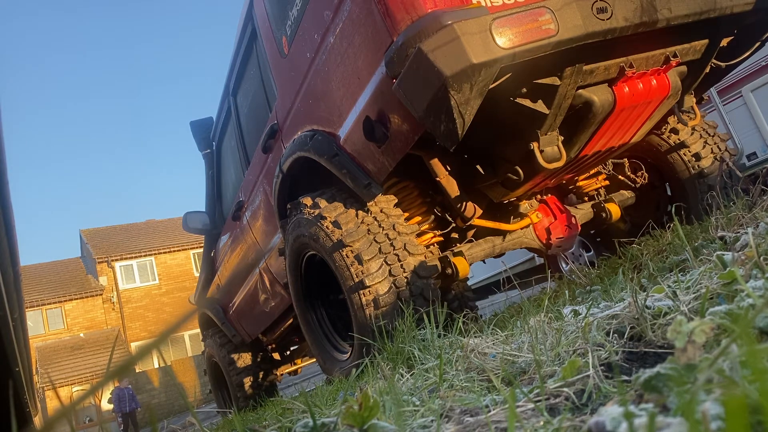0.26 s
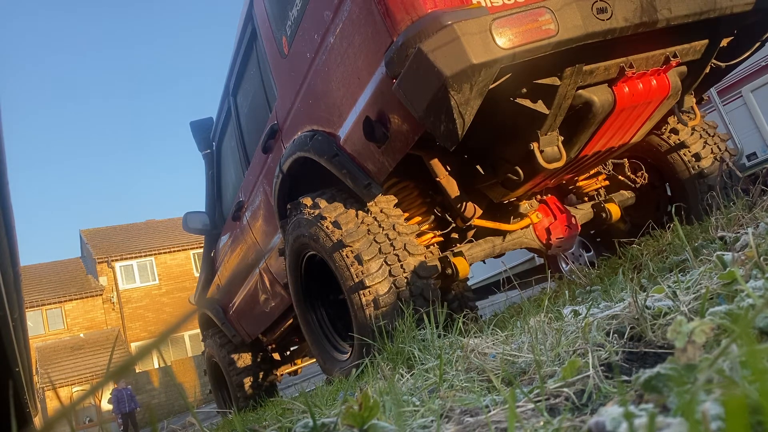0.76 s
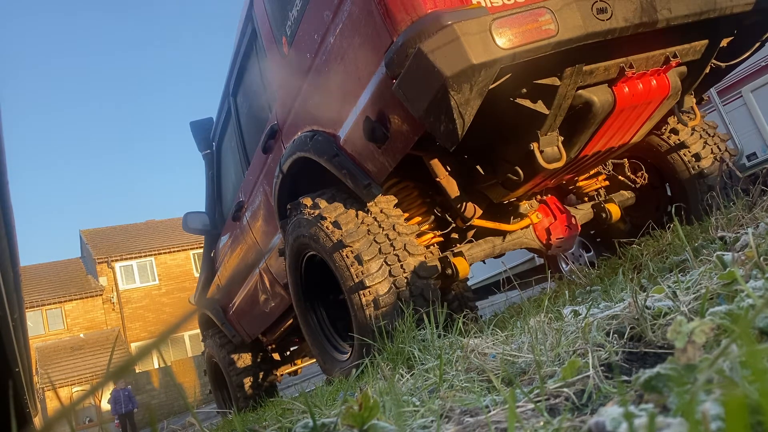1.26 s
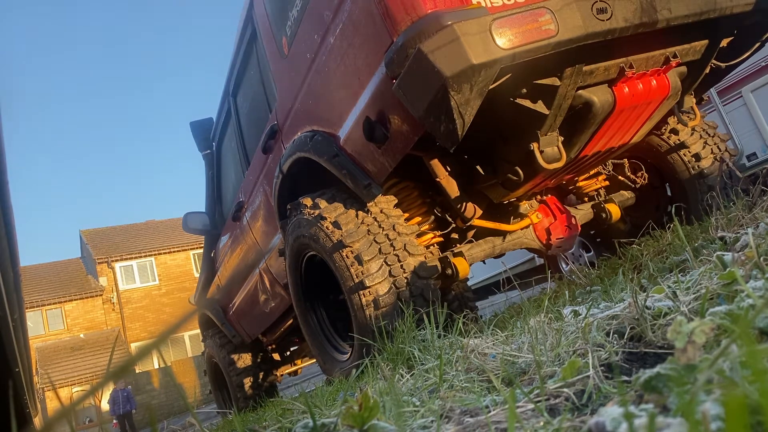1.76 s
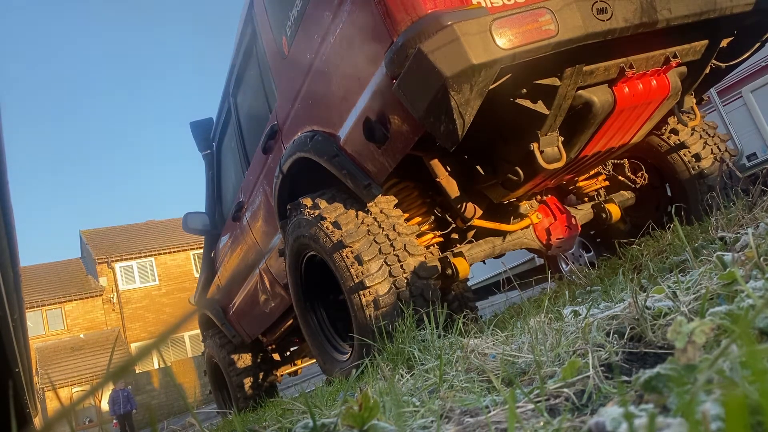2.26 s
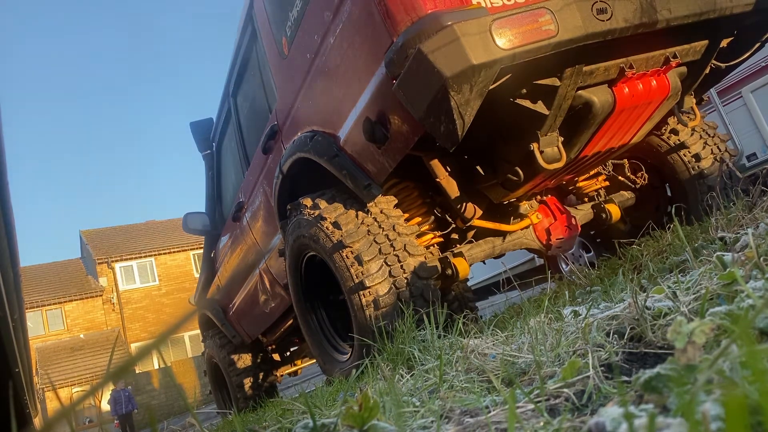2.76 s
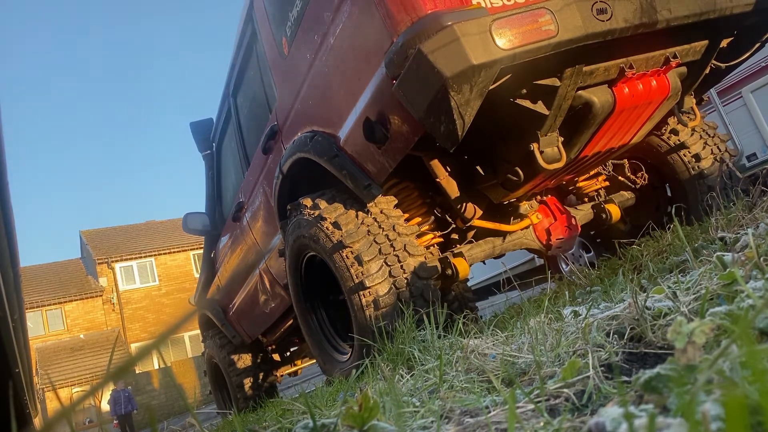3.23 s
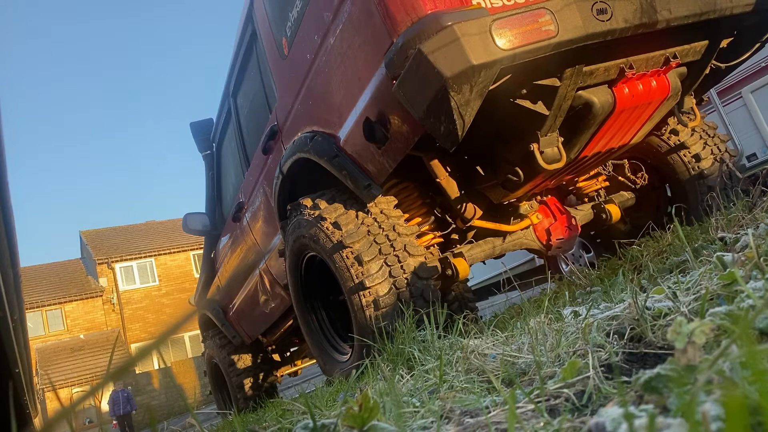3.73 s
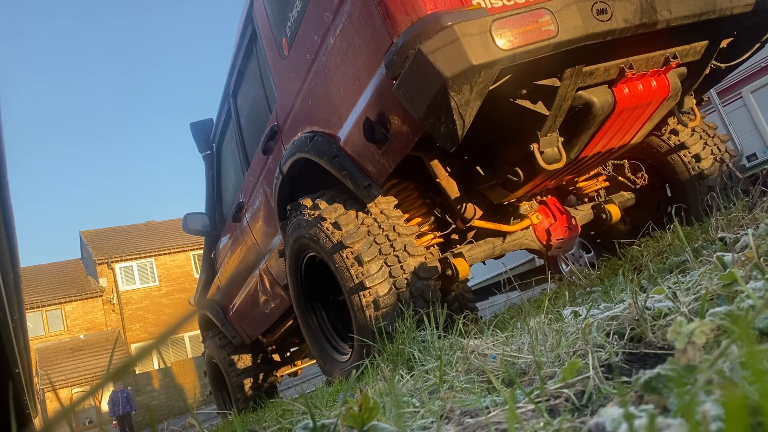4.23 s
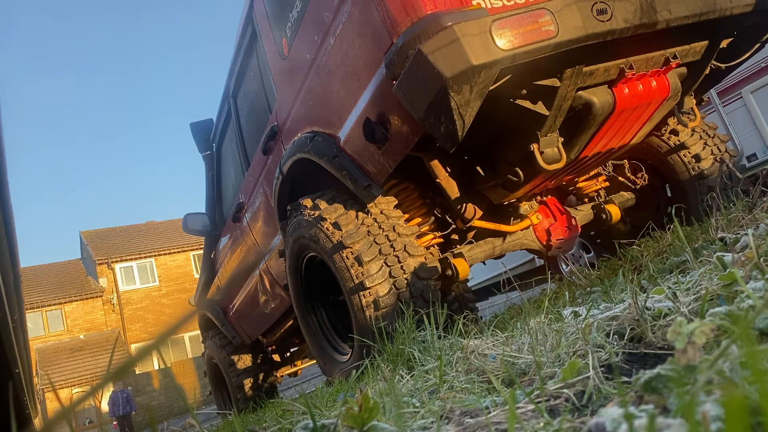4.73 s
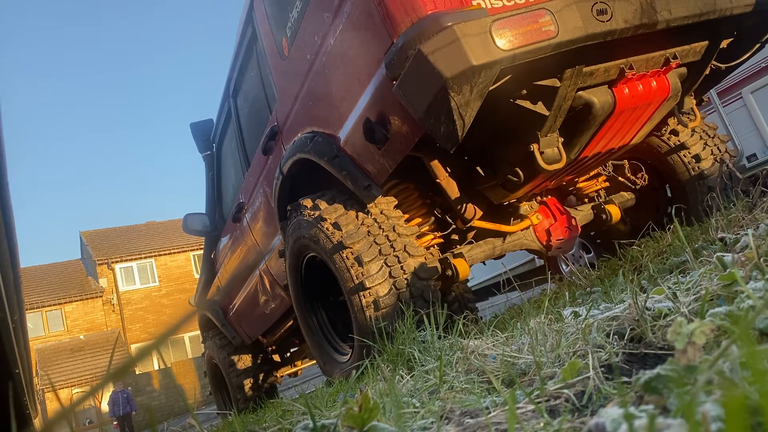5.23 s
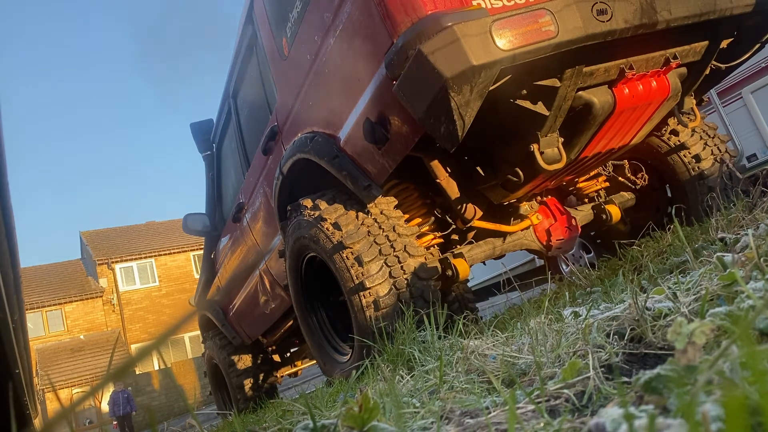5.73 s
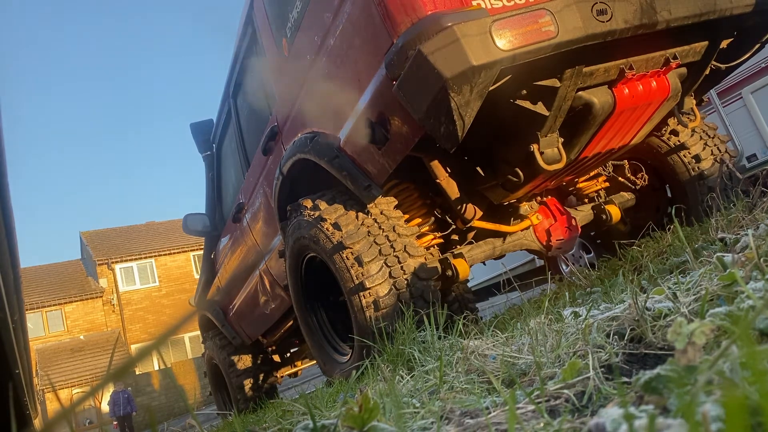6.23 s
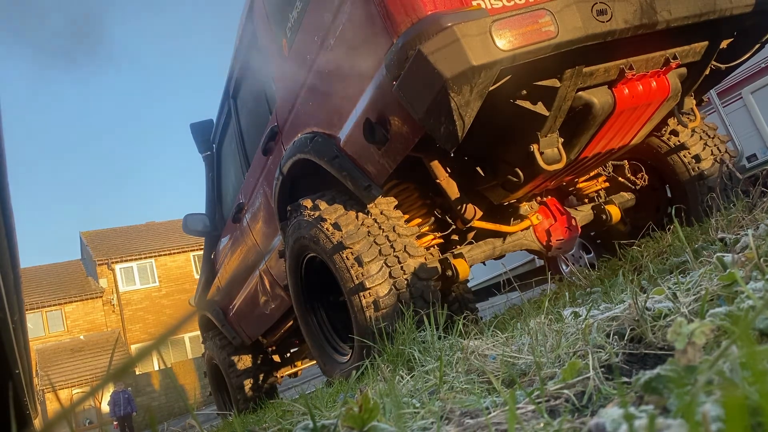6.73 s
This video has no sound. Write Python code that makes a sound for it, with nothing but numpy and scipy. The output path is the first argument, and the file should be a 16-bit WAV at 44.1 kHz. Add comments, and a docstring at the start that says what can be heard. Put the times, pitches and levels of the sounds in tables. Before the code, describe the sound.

A five-cylinder diesel hunts at idle, heard in close stereo near the exhaust outlet. It starts with a steady clattering chug, then lurches: quick loud barks with rattling knock and airy hiss, each dropping abruptly to soft, slower puffs and a fluttering whistle. A calmer stretch comes midway, then surging resumes, with the strongest bark near the end before it settles. Open air, almost no echo.

```python
"""A cold five-cylinder turbodiesel hunts at idle, heard outdoors close to its tail pipe.
Fuel comes in bursts: the engine speeds up and barks, then coasts almost silently while the whistle sinks.
Each firing sends filtered impulses down the pipe, noise bursts through block resonances and a spit of gas.
The turbo is a pair of randomly shaken tones; two close microphone ports hear it all unequally."""
import sys
import numpy as np
from scipy import signal
from scipy.fft import rfft, irfft, next_fast_len
from scipy.io import wavfile
from scipy.ndimage import uniform_filter1d, map_coordinates

SR = 44100
rng = np.random.default_rng(int(sys.argv[2]) if len(sys.argv) > 2 else 0)


def dump_mix(stems):
    """Bounce the given channels to the path in sys.argv[1] as a 16-bit WAV at rate SR."""
    frames = np.atleast_2d(stems).T  # one column per channel
    limited = np.clip(frames, -1, 1)  # hard clip at full scale
    pcm = np.round(limited * 32767).astype(np.int16)
    wavfile.write(sys.argv[1], SR, pcm)


def volts(x):
    """Linear amplitude factor 10**(x/20) for a level x in dB, scalar or array-like."""
    e = np.asarray(x, float) / 20
    return 10 ** e


N = 307818

# The governor's dose. Each row: time in seconds, share of full fuel.
FUEL_DOSE = [(0, 0.31), (0.574, 0.319), (0.621, 0.621), (0.664, 0.781), (0.723, 0.768), (0.792, 0.076),
             (0.968, 0.054), (1.021, 0.261), (1.054, 0.572), (1.242, 0.165), (1.308, 0.726), (1.413, 0.879),
             (1.431, 0.936), (1.484, 0.371), (1.525, 0.108), (1.706, 0.07), (1.782, 0.542), (1.993, 0.261),
             (2.092, 0.437), (2.198, 0.951), (2.294, 0.665), (2.32, 0.147), (2.519, 0.066), (2.586, 0.232),
             (2.622, 0.702), (2.703, 0.311), (3.002, 0.332), (3.327, 0.339), (3.349, 0.646), (3.5, 0.127),
             (3.613, 0.527), (3.672, 0.811), (3.774, 0.136), (3.92, 0.038), (3.922, 0.945), (4.049, 0.0),
             (4.156, 0.288), (4.318, 0.424), (4.397, 0.844), (4.5, 0.082), (4.622, 0.077), (4.623, 0.622),
             (4.775, 0.126), (4.876, 0.812), (4.952, 0.124), (5.025, 0.064), (5.078, 0.22), (5.135, 0.921),
             (5.208, 0.887), (5.287, 0.132), (5.327, 0.072), (5.432, 0.112), (5.64, 0.74), (5.698, 0.861),
             (5.858, 0.972), (5.885, 0.289), (6.033, 0.134), (6.198, 0.041), (6.272, 0.647), (6.425, 0.252),
             (6.647, 0.351), (6.98, 0.343)]
# Unequal manifold runs, in firing order. Each row: thump delay in ms at full spread,
# relative thump in dB, relative knock in dB.
CYLINDER_RUNS = [(-0.39, 0.5, -2), (1.27, -1, -3.5), (-2.38, -1, -2.5), (0.46, 1, -2.5), (-1.57, 1.7, -3)]
# Lowest modes of the exhaust pipe. Each row: frequency in Hz, width in Hz, relative level in dB.
PIPE_MODES = [(54.6, 26, -0.5), (137, 36, 1.5)]
# Block and underbody struck by a firing. Each row: frequency in Hz, width in Hz, relative level in dB.
BLOCK_MODES = [(223, 59, -0.5), (317, 72, 6.5), (510, 462, 0.5), (758, 98.4, 6), (901, 63, 1),
               (1172, 171, 1.5), (1369, 150, 0.1), (1667, 104, -4.5), (1809, 70, -6.5), (2548, 18, -14),
               (3220, 130, -11.5), (5510, 215, -11.5)]
# Spectrum of one firing's thump. Each row: frequency in Hz, relative level in dB.
THUMP_SPECTRUM = [(80, -58), (120, -8), (150, 2.5), (190, 0.7), (235, 1.5), (262, -10.5), (320, -4),
                  (450, -30.5), (800, -77)]
# Turbulence inside the pipe. Each row: frequency in Hz, relative level in dB.
DRONE_SPECTRUM = [(30, -36), (50, -2.5), (120, -2), (230, 0.7), (300, -12), (750, -17), (1400, -26.5),
                  (2100, -38), (3300, -36), (6000, -47), (10000, -66), (15800, -98)]
# Gas at the pipe mouth. Each row: frequency in Hz, relative level in dB.
HISS_SPECTRUM = [(1500, -66), (2600, 0.5), (3300, -1), (4500, -2), (5500, -5), (6300, -1), (8000, -9),
                 (9700, -6.5), (10800, -19), (13000, -11), (14500, -78), (15800, -54)]
# The pipe mouth favours some whistle pitches. Each row: frequency in Hz, gain in dB.
OUTLET_GAIN = [(2520, -0.5), (2720, -12), (2950, -2), (3070, -1.5), (3250, 6.5), (3380, 5.5), (3550, 1),
               (3800, 0.5), (4200, -1), (5100, -4)]
# Lead of the first port over the second. Each row: frequency in Hz, phase in radians.
PORT_LEAD = [(0, 0), (1980, -0.1), (2330, 2.5), (2840, -4.7), (3100, -5.1), (5250, -4.5), (6460, -5.2),
             (7410, -1.7), (10200, -6.0), (11600, -6.4), (12500, -9.2), (14400, -9.5), (15000, -12.6),
             (16600, -12.5)]
# Gain of the first port over the second. Each row: frequency in Hz, gain in dB.
PORT_TILT = [(60, -1.0), (110, -1.5), (200, -1.5), (380, -1.5), (700, -2.0), (1290, -3.0), (2380, 1.0),
             (4400, 2.5), (8120, 2.0), (15000, 0.0)]
# Likeness of the ports before lead and tilt. Each row: frequency in Hz, correlation for equal sources.
PORT_LIKENESS = [(100, .999), (600, .99), (1500, .96), (2500, .91), (5000, .82), (14000, .84)]
# How a layer follows the engine, before its own offset. Each row: level in dB at a dose sum of 1,
# dB per tenfold dose, dose left without fuel (sign ignored), lag in seconds (negative: none),
# dB per tenfold speed, dB per tenfold boost.
THUMP_FOLLOW = (-6.5, 22, 0.0662, -0.03, 0.5, -7)
BOOM_FOLLOW = (-11.8, 15.5, .03, .006, -12, 4)
KNOCK_FOLLOW = (-12.5, 26, 0, 0.0051, 5.5, -14)
HISS_FOLLOW = (-29, 25.5, -0.01, -0.01, 3.5, -10.5)
WHISTLE_FOLLOW = (-28.5, 11.5, 0.2, -1.3, -11, -1.5)

FIRST_TURN = .17  # share of a firing interval already past at the start
# speed in firings/s: settled without fuel, added at full fuel; flywheel lag
COAST_RATE_HZ, FUEL_RATE_HZ, FLYWHEEL_S = 24.6154, 51.058, .2265
IDLE_RATE_HZ, IDLE_BOOST = 41.5, .2  # reference speed, share of full boost
BOOST_POWER, SPOOL_S = 1.438, .567
# turbine pitch: at the start without fuel, its climb, added at full boost
SPIN_HZ, WARM_HZ_PER_S, BOOST_HZ = 1010, 55.6, 7795
SURGE_HZ, SURGE_S = 330, .06  # quick extra pitch under full fuel, its lag
HEARD_EARLY_S = .0031  # a dose sounds this long before its push reaches the flywheel
RUSH_HZ, RUSH_PULL = 5000, .35  # pitch of rushing air, share of the way the whoosh is drawn to it
# gain control: memory, level left alone, share of a rise taken back
GAIN_LAG_S, GAIN_FROM_DB, GAIN_SHARE = 1, -13.5, 1
TOP_HZ = 15830


def along(points, hz):
    """(Hz, value) points interpolated on a log frequency axis."""
    f, v = np.transpose(points)
    return np.interp(np.log(hz + 1), np.log(f + 1), v)


def unit(x):
    """Scaled to rms 1."""
    return x / np.sqrt(np.mean(x ** 2) + 1e-20)


def filtered(x, response):
    """x times a complex response of frequency."""
    m = next_fast_len(N + SR // 2)
    return irfft(rfft(x, m) * response(np.fft.rfftfreq(m, 1 / SR)), m)[..., :N]


def coloured(spectrum, x):
    """x through a (Hz, dB) spectrum, zero phase."""
    return filtered(x, lambda hz: volts(along(spectrum, hz)))


def resonances(modes):
    """Causal response of second-order (Hz, width, dB) modes, alternating in sign."""
    def response(hz):
        total = 0
        for k, (centre, width, db) in enumerate(modes):
            damping = 1j * hz * width
            total = total + (-1) ** k * volts(db) * damping / (centre ** 2 - hz ** 2 + damping)
        return total
    return response


def noise():
    """Two unrelated white noises: the direct sound and what scatters off the underbody."""
    return rng.standard_normal((2, N))


def train(at, sizes):
    """Impulses of the given sizes."""
    return np.bincount(np.clip(at.astype(int), 0, N - 1), sizes, N)


def bursts(at, sizes, rise_s, fall_s):
    """Envelope that swells to a peak 3 ms ahead of each firing mark and dies away."""
    t = np.arange(-SR // 20, SR // 20 + 1) / SR
    shape = np.where(t < 0, np.exp(-(t / rise_s) ** 2), np.exp(-np.abs(t) / fall_s))
    peaks = at - .003 * SR
    return np.abs(signal.fftconvolve(train(peaks, sizes), shape, mode="same"))


def lagged(x, lag_s, start=None):
    """x followed with a first-order delay, as by an inertia."""
    keep = np.exp(-1 / (max(lag_s, 1 / SR) * SR))
    first = x[0] if start is None else start
    return signal.lfilter([1 - keep], [1, -keep], x, zi=[keep * first])[0]


def fuel(ahead_s=0):
    """Share of full fuel per sample, read ahead_s early."""
    return np.interp(np.arange(N) / SR + ahead_s, *np.transpose(FUEL_DOSE))


def speed():
    """Firings a second: the flywheel follows the fuel."""
    return lagged(COAST_RATE_HZ + FUEL_RATE_HZ * fuel(), FLYWHEEL_S)


def boost():
    """Share of full boost: exhaust energy spools the turbo up slowly."""
    return lagged(fuel() ** BOOST_POWER, SPOOL_S)


def turbine():
    """Whistle pitch in Hz: follows boost, surges under a full dose, climbs as the wheel warms."""
    warm_hz = lagged(SPIN_HZ + WARM_HZ_PER_S * np.arange(N) / SR, SPOOL_S)
    return warm_hz + BOOST_HZ * boost() + SURGE_HZ * lagged(fuel() ** 2, SURGE_S)


def load(law):
    """Level in dB of a layer, from fuel, speed and boost; more air changes the burn."""
    full_db, per_dose, rest, lag_s, per_speed, per_boost = law
    dose = lagged(fuel(HEARD_EARLY_S), lag_s) + abs(rest)
    burn_db = full_db + per_dose * np.log10(dose)
    speed_db = per_speed * np.log10(speed() / IDLE_RATE_HZ)
    return burn_db + speed_db + per_boost * np.log10(boost() / IDLE_BOOST)


def per_firing(at, law):
    """A load as gain, held from 11 ms after one firing to 11 ms after the next."""
    firing = np.searchsorted(at, np.arange(N) - .011 * SR)
    held_db = load(law)[at][np.clip(firing, 0, len(at) - 1)]
    return volts(uniform_filter1d(held_db, size=SR // 200))


def firings():
    """Sample index and cylinder row of every firing, from the integrated speed."""
    turns = FIRST_TURN + np.cumsum(speed()) / SR
    at = np.flatnonzero(np.diff(np.floor(turns)))
    return at, np.array(CYLINDER_RUNS)[np.arange(len(at)) % len(CYLINDER_RUNS)]


def exhaust(at, cylinder, jitter_ms, scatter_db, drone_ref_db):
    """Suction pulses leave the pipe .31 interval late, thump and boom; turbulent gas drones under them."""
    chance = rng.standard_normal((len(at), 2))
    arrival = at + .31 * np.gradient(at)
    thump_db = load(THUMP_FOLLOW)
    spread = np.clip(volts(-17 - thump_db[at]), .3, 1)  # a full dose evens out the cylinders
    delay_ms = spread * (cylinder[:, 0] + jitter_ms * chance[:, 0])
    sizes = -volts(cylinder[:, 1] + scatter_db * chance[:, 1])
    thump = unit(coloured(THUMP_SPECTRUM, train(arrival + delay_ms * SR / 1000, sizes)))

    def pipe(hz):
        lowpass = 1 / (1 + (hz / 150) ** 6)
        highpass = 1 / (1 + (33 / (hz + 1)) ** 8)
        return resonances(PIPE_MODES)(hz) * lowpass * highpass

    boom = unit(filtered(train(arrival, -np.ones(len(at))), pipe))
    drone_db = drone_ref_db + .46 * (thump_db + 23)  # turbulence varies less than the pulses
    drone = volts(drone_db) * unit(coloured(DRONE_SPECTRUM, noise()))
    direct = np.array([[1], [0]])
    return drone + direct * (volts(thump_db - 3.0) * thump + volts(load(BOOM_FOLLOW)) * boom)


def knock(at, cylinder, scatter_db, between_db, sharp_db):
    """Diesel knock: one sharp blow and a few rough milliseconds into the block, over a steadier rattle."""
    chance = rng.standard_normal((len(at), 2))
    sizes = volts(cylinder[:, 2] + scatter_db * chance[:, 0])
    envelope = unit(bursts(at, sizes, rise_s=.0054, fall_s=.0047)) + volts(between_db)
    rough = unit(noise() * volts(2.15 * rng.standard_normal(N)))
    blow_at = at + (.0004 * chance[:, 1] - .005) * SR
    sharp = volts(sharp_db) * unit(train(blow_at, sizes))

    def block(hz):
        highpass = (1j * hz / 140 / (1 + 1j * hz / 140)) ** 2
        return resonances(BLOCK_MODES)(hz) * highpass

    return per_firing(at, KNOCK_FOLLOW) * unit(filtered(envelope * rough + sharp, block))


def hiss(at, scatter_db, between_db):
    """Gas spits from the pipe mouth with each firing, over a steady flow."""
    sizes = volts(scatter_db * rng.standard_normal(len(at)))
    puff = unit(bursts(at, sizes, rise_s=.0039, fall_s=.0046)) + volts(between_db)
    grain = noise() * volts(2.3 * rng.standard_normal(N))
    spit = unit(coloured(HISS_SPECTRUM, puff * grain))
    steady = volts(-52.5) * unit(coloured(HISS_SPECTRUM, noise()))  # air is pumped even without fuel
    return volts(4.5) * per_firing(at, HISS_FOLLOW) * spit + steady


def gliding(width_hz, knot_s, above_hz=0):
    """A pair of tones above_hz over the turbine pitch, each shaken at random by width_hz."""
    knots = rng.standard_normal((2, int(N / SR / knot_s) + 4))
    places = [np.arange(N) / SR / knot_s]
    wander = np.array([map_coordinates(row, places) for row in knots])
    pitch_hz = turbine() + above_hz + width_hz * wander
    return np.sin(2 * np.pi * np.cumsum(pitch_hz, axis=1) / SR)


def whistle(at, whoosh_ref_db):
    """The turbine sings a tone that puffs chop into beads; hard gas flow turns it into a broad whoosh."""
    flow = np.minimum(uniform_filter1d(volts(load(HISS_FOLLOW) + 32.5), size=SR // 20), 1)
    throb = unit(bursts(at, volts(rng.standard_normal(len(at))), rise_s=.0045, fall_s=.005))
    fuelled = np.clip(5 * flow, .55, 1)  # a coasting engine puffs less
    chop = fuelled * throb + (1 - fuelled) * .5 + .1
    beads = chop * gliding(80 + 150 * flow ** 2, knot_s=.0017)
    whoosh_gain = volts(whoosh_ref_db) * flow ** 2 * np.sqrt(boost() / IDLE_BOOST) * (.5 + .7 * throb)
    pull_hz = RUSH_PULL * (RUSH_HZ - turbine())
    whoosh = whoosh_gain * gliding(380, knot_s=.0008, above_hz=pull_hz)
    clear = 1 - .4 * flow ** 2
    voice = volts(load(WHISTLE_FOLLOW)) * clear * beads
    return coloured(OUTLET_GAIN, voice) + whoosh


def ports(pair):
    """Two ports: a lead and a tilt by frequency; scattered sound reaches them with opposite signs."""
    side = np.array([[.5], [-.5]])

    def turn(hz):
        return np.arccos(np.clip(along(PORT_LIKENESS, hz), 0, 1)) / 2

    def port(hz):
        return volts(side * along(PORT_TILT, hz)) * np.exp(1j * side * along(PORT_LEAD, hz))

    direct = filtered(pair[0], lambda hz: np.cos(turn(hz)) * port(hz))
    scattered = filtered(pair[1], lambda hz: 2 * side * np.sin(turn(hz)) * port(hz))
    return direct + scattered


def scene():
    """The engine as the two ports hear it."""
    at, cylinder = firings()
    engine = exhaust(at, cylinder, jitter_ms=.31, scatter_db=1.4, drone_ref_db=-23.5)
    engine = engine + knock(at, cylinder, scatter_db=1.76, between_db=-21, sharp_db=-4.5)
    engine = engine + hiss(at, scatter_db=3.5, between_db=-5)
    return ports(engine + whistle(at, whoosh_ref_db=-27.5))


def low_pass(x):
    """Removes everything above the highest recorded frequency."""
    return signal.sosfilt(signal.butter(12, 17020, fs=SR, output="sos"), x)


def record(dry):
    """Gain control rides the slow level, peaks are rounded off and the top band is dropped."""
    power = np.mean(dry ** 2, axis=0)
    slow_db = 10 * np.log10(lagged(power, GAIN_LAG_S, start=volts(2 * GAIN_FROM_DB)))
    ridden = dry * volts(GAIN_SHARE * (GAIN_FROM_DB - slow_db))
    rounded = ridden / (1 + np.abs(ridden) ** 6) ** (1 / 6)
    mix = filtered(rounded, lambda hz: hz < TOP_HZ)
    return low_pass(mix)


dry = scene()
out = record(dry)
dump_mix(out)
```